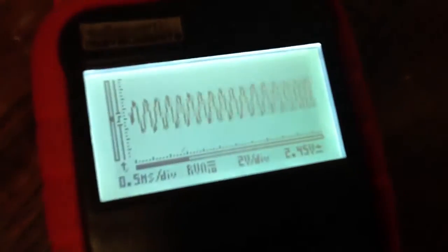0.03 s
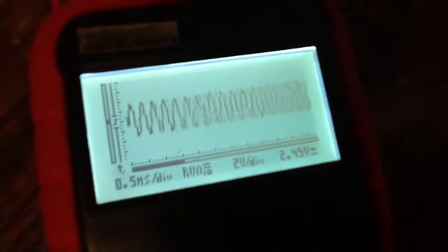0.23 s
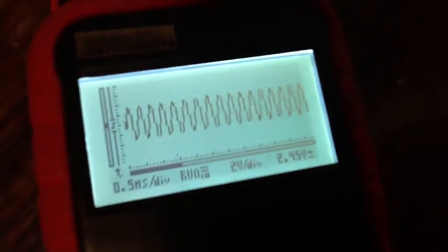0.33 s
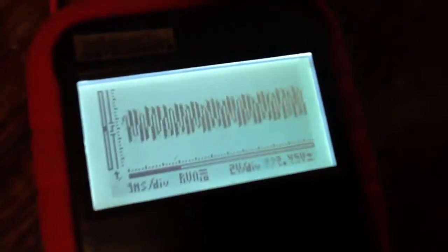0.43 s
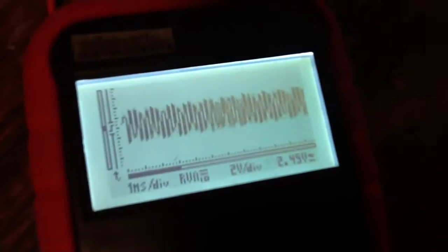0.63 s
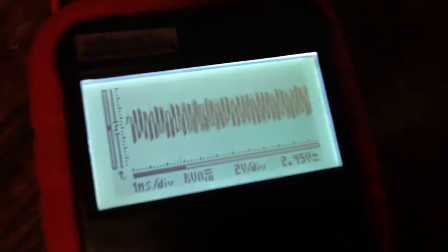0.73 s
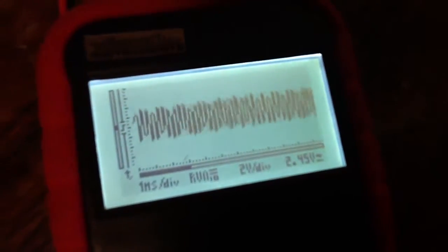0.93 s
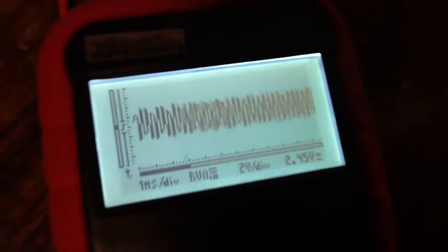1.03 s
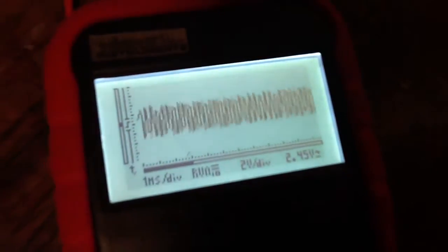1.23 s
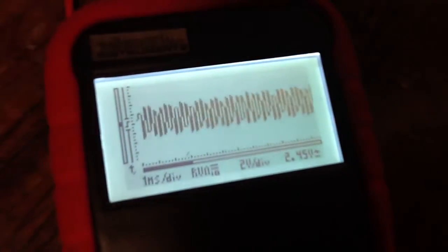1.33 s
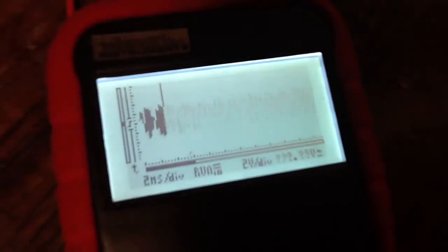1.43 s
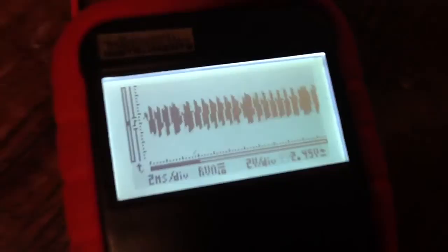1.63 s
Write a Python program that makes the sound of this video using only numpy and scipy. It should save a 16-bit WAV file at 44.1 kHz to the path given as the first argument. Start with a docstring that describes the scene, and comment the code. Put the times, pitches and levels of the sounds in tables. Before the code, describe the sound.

A button on a handheld meter is pressed and let go twice. Each press is a sharp, bright click, each release a duller plastic knock. Heard close up in a quiet room with faint hiss and hum.

```python
"""A quiet room, close to a handheld meter whose button is pressed and let go twice.
Each press snaps a stiff dome and rings the plastic case brightly; each release is a duller knock
with a thin rattle. The table throws back a quick echo, the room a short tail.
Underneath lies a faint bed of hiss, low room noise and mains hum."""
import sys
import numpy as np
from scipy import signal
from scipy.fft import rfft, irfft
from scipy.io import wavfile

SR = 44100
rng = np.random.default_rng(int(sys.argv[2]) if len(sys.argv) > 2 else 0)


def persist_wave(psi):
    """Save psi, clipped to +-1, as 16-bit WAV."""
    counts = np.round(np.clip(psi, -1, 1) * 32767).astype(np.int16)
    wavfile.write(sys.argv[1], SR, np.atleast_2d(counts).T)


N = 74970
T = np.arange(N) / SR

# The dome snaps in. Each row: start in seconds, level in dB.
PRESSES = [(0.2390, -0.5), (1.247, -1)]
# The key springs back. Each row: start in seconds, knock level in dB, rattle level in dB.
RELEASES = [(0.5588, 0.3, -41), (1.3946, -1.2, -36.5)]
# The ring of the case. Each row: pitch in Hz, t60 in seconds, press gain in dB, release gain in dB.
CASE_MODES = [(212, 0.018, -47.5, -48.5), (414.6, 0.043, -42, -41), (630, 0.06, -44, -36),
              (751.4, 0.057, -51.5, -39.5), (858, 0.022, -35, -33.5), (985, 0.022, -32.5, -30.5),
              (1187, 0.052, -39, -40.5), (1276, 0.0093, -38.5, -35), (1762, 0.021, -32, -33),
              (2236, 0.0092, -26, -46), (2625, 0.021, -39, -40.5), (3420, 0.0083, -24.5, -41),
              (3770, 0.014, -17.5, -50), (4830, 0.0097, -21.5, -52.5), (5690, 0.011, -13.5, -52),
              (6270, 0.00935, -21, -45), (7100, 0.01, -21, -47.5), (8405, 0.0032, -13, -38.5),
              (10390, 0.0075, -35, -33.5)]
# Noise colours, from the clicks down to the bed. Each row: frequency in Hz, relative level in dB.
CHATTER_COLOUR = [(500, -65), (2000, -27), (3500, 14), (5700, -5), (8000, 10), (11000, -2.5), (15000, -8.5)]   # bright sizzle of the dome
RATTLE_COLOUR = [(300, -20), (800, 6), (1500, -3), (3300, 6), (6000, -0.5), (10000, -11), (13500, 6.5),
                 (15500, -11)]   # thin rattle of the key
EARLY_COLOUR = [(200, -14.5), (600, 14), (1000, -6.5), (1500, 14.5), (2500, -2.5), (4500, 4), (7000, 4),
                (11000, 2.5), (15000, -7)]   # reflections off nearby surfaces
PRESS_TAIL_COLOUR = [(400, -26.5), (650, -3.5), (1200, -8), (1800, -11), (2800, -9), (3800, -3.5),
                     (5400, 1), (7000, -8), (9000, -14.5), (15000, -19.5)]   # airy wash after a press
RELEASE_TAIL_COLOUR = [(300, -3), (600, -0.5), (1000, 4.5), (1600, -8), (2200, -14), (3200, -12.5),
                       (6000, -33), (15000, -17)]   # darker wash after a release
ROOM_TONE_COLOUR = [(25, -45), (45, -25.5), (75, -16), (100, -17.5), (125, -2.5), (150, -6.5), (185, -1.5),
                    (240, -5.5), (320, -10.5), (450, -16.5), (700, -22.5), (1500, -30), (4000, -47.5)]   # low room noise
HISS_COLOUR = [(200, -3.5), (1000, -2), (3000, -2.5), (6000, -2.5), (12000, -1), (15000, 0)]   # nearly flat hiss
# Mains hum and other low steady tones. Each row: pitch in Hz, rms level in dB.
HUM_TONES = [(59, -87), (119, -77.5), (147, -69.5), (239, -75)]


def presses():
    """The dome cracks, hits its seat and chatters briefly, ringing the high modes of the case."""
    seat_lag_s, seat_db = 0.001214, -14.5
    chatter_noise = from_db(-29.5) * noise(CHATTER_COLOUR)
    gains_db = [press_db for _, _, press_db, _ in CASE_MODES]
    out = np.zeros(N)
    for start, level_db in PRESSES:
        crack = from_db(-3.5) * high_pass(ring(start, hz=7700, t60=0.00099), hz=4200)
        body = case_blow(start, gains_db) + from_db(seat_db) * case_blow(start + seat_lag_s, gains_db)
        chatter = chatter_noise * burst(start, t60=0.013, hold=0.002)
        out += from_db(level_db) * (crack + body + chatter)
    return out


def releases():
    """The loose key knocks back on the case, ringing the low modes, bounces once and rattles to rest."""
    bounce_lag_s, bounce_db = 0.000901, -7.5
    rattle_noise = noise(RATTLE_COLOUR)
    gains_db = [release_db for _, _, _, release_db in CASE_MODES]
    out = np.zeros(N)
    for start, knock_db, rattle_db in RELEASES:
        knock = case_blow(start, gains_db)
        bounce = from_db(bounce_db) * case_blow(start + bounce_lag_s, gains_db)
        rattle = rattle_noise * burst(start, t60=0.013, hold=0.002)
        out += from_db(knock_db) * (knock + bounce) + from_db(rattle_db) * rattle
    return out


def case_blow(start, gains_db):
    """One hit on the plastic case; neighbouring modes swing against each other."""
    return sum((-1) ** k * from_db(gains_db[k]) * ring(start, hz, t60)
               for k, (hz, t60, _, _) in enumerate(CASE_MODES))


def reflections(clicks):
    """A quick slap off the table, then a dense spray from nearby surfaces."""
    lag_s = 0.0031
    table_echo = np.interp(T - lag_s, T, clicks, left=0)
    spray = noise(EARLY_COLOUR) * burst(lag_s, t60=0.072)
    response = unit_rms(spray) / np.sqrt(N)   # unit energy
    early = signal.fftconvolve(clicks, response)[:N]
    return from_db(-18) * table_echo + from_db(-19.5) * early


def room_tail(events, colour, level_db):
    """Each click scatters round the room and comes back as an even, dying wash."""
    gap_s = 0.0054
    envelope = sum(from_db(level_db + click_db) * burst(start + gap_s, t60=0.18)
                   for start, click_db, *_ in events)
    return noise(colour) * envelope


def background():
    """The bed: low room tone, microphone hiss and gently wavering hum."""
    bed = from_db(-65) * (noise(ROOM_TONE_COLOUR) + noise(HISS_COLOUR))
    for hz, rms_db in HUM_TONES:
        waver = 1 + 0.083 * noise([(1, 0), (4, 0), (40, -80)])   # slow drift, mostly below 4 Hz
        tone = np.sqrt(2) * np.sin(2 * np.pi * (hz * T + rng.random()))
        bed += from_db(rms_db) * waver * tone
    return bed


def ring(start, hz, t60):
    """A struck mode: a sine that dies away."""
    return burst(start, t60) * np.sin(2 * np.pi * hz * (T - start))


def burst(start, t60, hold=0):
    """Envelope: instant attack, a hold, then a fall of 60 dB per t60; times in seconds."""
    return (T >= start) * np.exp(-np.log(1000) * np.clip((T - start - hold) / t60, 0, 10))


def noise(colour):
    """Steady noise of the given colour, rms 1."""
    hz, db = np.transpose(colour)
    bin_hz = np.maximum(np.arange(N // 2 + 1) * SR / N, 1)
    gain = from_db(np.interp(np.log(bin_hz), np.log(hz), db))
    return unit_rms(irfft(rfft(rng.standard_normal(N)) * gain, N))


def high_pass(x, hz):
    """Second-order low cut."""
    return signal.sosfilt(signal.butter(2, hz, "high", fs=SR, output="sos"), x)


def from_db(db):
    """Decibels to gain."""
    return 10 ** (np.asarray(db) / 20)


def unit_rms(x):
    """Scale to rms 1."""
    return x / np.sqrt(np.mean(x ** 2) + 1e-20)


def scene():
    """The mono mix: clicks up front, the room behind them, the bed underneath."""
    clicks = high_pass(presses() + releases(), hz=147)   # the small case radiates little bass
    press_tail = room_tail(PRESSES, PRESS_TAIL_COLOUR, level_db=-46)
    release_tail = room_tail(RELEASES, RELEASE_TAIL_COLOUR, level_db=-54)
    return (clicks + reflections(clicks) + press_tail + release_tail + background())[None]


def record(dry):
    """A steep high cut takes off the very top."""
    cutoff_hz = 15400
    return signal.sosfilt(signal.ellip(10, .1, 70, cutoff_hz, fs=SR, output="sos"), dry)


dry = scene()
out = record(dry)
persist_wave(out)
```